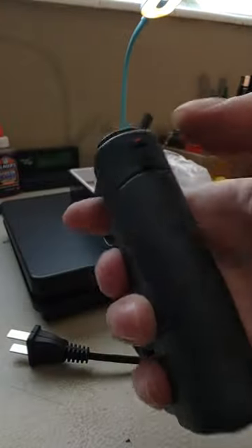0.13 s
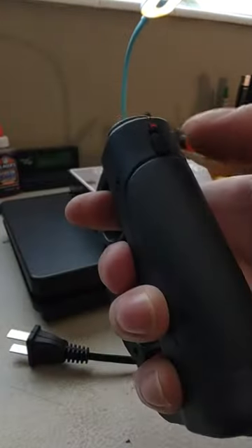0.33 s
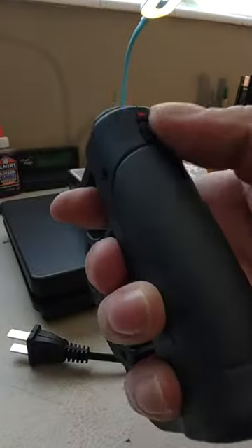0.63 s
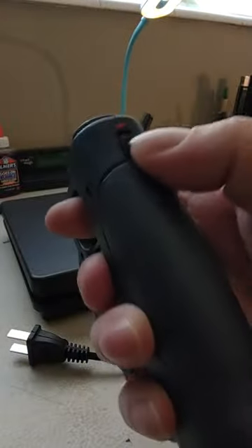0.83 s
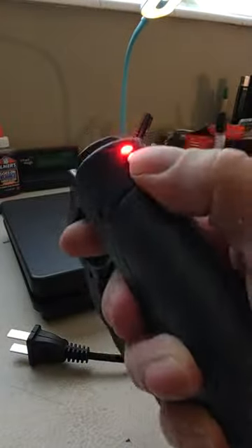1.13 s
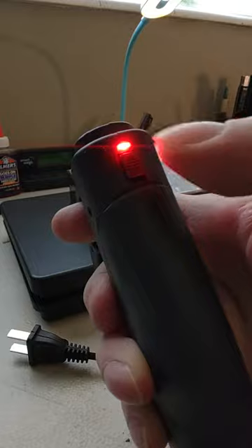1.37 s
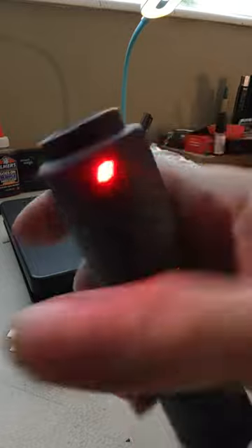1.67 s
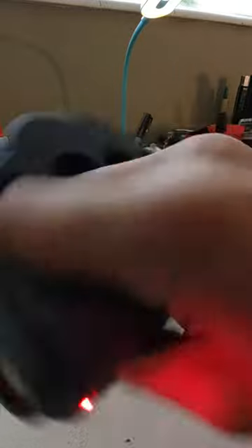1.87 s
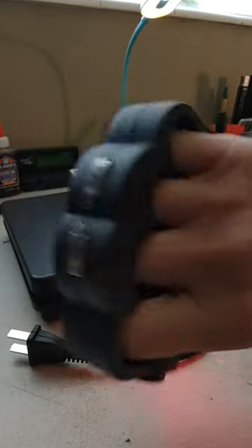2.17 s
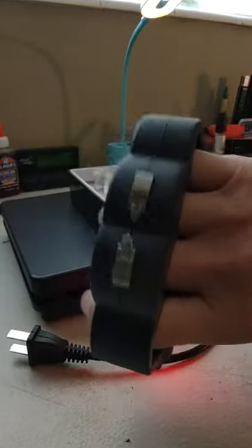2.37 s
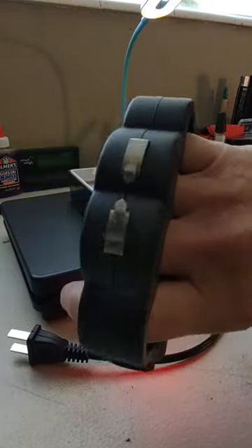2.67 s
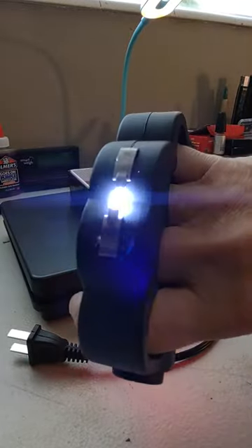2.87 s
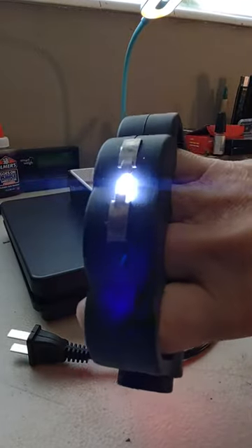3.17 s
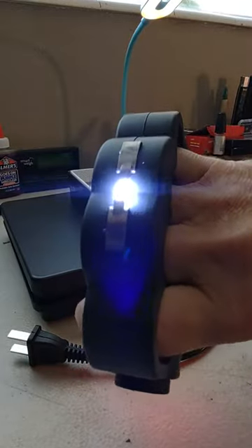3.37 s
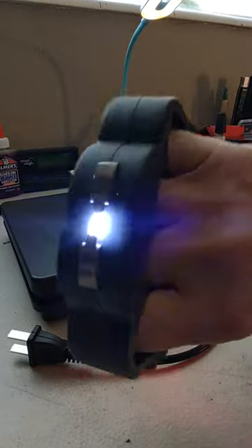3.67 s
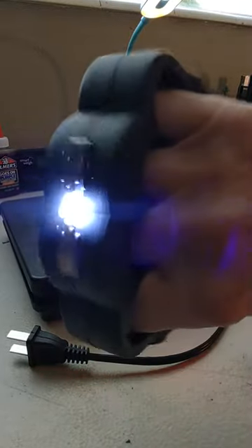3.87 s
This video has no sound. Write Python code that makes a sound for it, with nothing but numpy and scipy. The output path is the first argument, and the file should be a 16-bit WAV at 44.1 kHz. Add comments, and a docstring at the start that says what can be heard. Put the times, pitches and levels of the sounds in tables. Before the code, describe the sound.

A stun gun fires close to the microphone in a small room. First come faint finger rubs on its plastic case and a few switch clicks, then a loud, rapid crackling buzz of sparks for the last second.

```python
"""In a small room, a hand turns a plastic stun gun close to the microphone.
Fingers rub the case; the safety switch and the trigger click. Then sparks jump the electrodes
about 45 times a second, unevenly. Each is a low pressure push and a hard crack that the desk
and walls throw back; the cracks overload the recorder. Faint room noise lies underneath."""
import sys
import numpy as np
from scipy import signal
from scipy.fft import rfft, irfft, next_fast_len
from scipy.io import wavfile
from scipy.ndimage import uniform_filter1d

SR = 44100
rng = np.random.default_rng(int(sys.argv[2]) if len(sys.argv) > 2 else 0)


def store_wav(level_fs):
    """Save 16-bit WAV to argv[1]."""
    pcm = np.round(np.clip(np.atleast_2d(level_fs), -1, 1) * 32767)
    wavfile.write(sys.argv[1], SR, pcm.T.astype(np.int16))


N = 176400

# Spark train. Each row: start in seconds, relative crack level in dB.
SPARKS = [(2.9269, -16), (2.9531, -14.5), (2.9744, -16.5), (2.9986, -15.5), (3.0217, -17.5),
          (3.0398, -16.5), (3.0631, -16.7), (3.0871, -18), (3.1114, -16.5), (3.1343, -16.5), (3.1545, -18),
          (3.1752, -17), (3.1992, -16.6), (3.2249, -18.5), (3.251, -17), (3.2745, -17), (3.2978, -16.5),
          (3.3206, -16.5), (3.3417, -16.8), (3.3635, -18), (3.382, -16), (3.4046, -16), (3.4302, -15.9),
          (3.4506, -18), (3.4684, -15), (3.4914, -15.7), (3.5111, -18), (3.5366, -16), (3.5564, -18),
          (3.5747, -16.5), (3.6001, -15.5), (3.6189, -16.5), (3.6433, -16.5), (3.6633, -18),
          (3.6828, -16.5), (3.7024, -17.5), (3.7214, -16), (3.7406, -18.5), (3.7592, -17), (3.7794, -18.5),
          (3.8003, -17), (3.821, -20), (3.8445, -18), (3.8628, -20.5), (3.8852, -18), (3.9105, -16.5),
          (3.93, -16.9), (3.954, -15.5), (3.9733, -19), (3.9938, -15.7)]


def amp(db):
    """Decibels to gain."""
    return 10 ** (np.asarray(db) / 20)


def gain_at(levels, time_s):
    """Gain along (seconds, dB) points."""
    return amp(np.interp(time_s, *np.transpose(levels)))


def pan(left_minus_right_db):
    """Left and right gains."""
    return amp(left_minus_right_db * np.array([[.5], [-.5]]))


def unit(x):
    """Scale to rms 1."""
    return x / np.sqrt(np.mean(x ** 2) + 1e-20)


def along(points, hz):
    """Interpolate (Hz, value) points on a log axis."""
    points_hz, values = np.transpose(points)
    return np.interp(np.log(hz + 1), np.log(points_hz + 1), values)


def filtered(x, response):
    """Apply a frequency response."""
    size = x.shape[-1]
    padded = next_fast_len(size + 8192)
    return irfft(rfft(x, padded) * response(np.fft.rfftfreq(padded, 1 / SR)), padded)[..., :size]


def noise(spectrum, size):
    """Coloured stereo noise of rms 1, left and right alike in the bass."""
    # Stereo likeness. Each row: frequency in Hz, left-right correlation.
    likeness = [(130, 0.79), (300, 0.65), (700, 0.33), (1500, 0)]

    def mid_side(hz):
        angle = np.arccos(along(likeness, hz)) / 2
        return amp(along(spectrum, hz)) * [np.cos(angle), np.sin(angle)]

    mid, side = filtered(rng.standard_normal((2, size)), mid_side)
    return unit(np.array([mid + side, mid - side]))


def fade(t, t60_s):
    """Exponential decay, 60 dB in t60_s."""
    return np.exp(-np.log(1000) * t / t60_s)


def add(out, start_s, x):
    """Mix x into out."""
    part = out[:, round(start_s * SR):][:, :x.shape[-1]]
    part += x[..., :part.shape[1]]


def ride_band(x, levels, centre_hz, width_hz):
    """Raise or lower one band over time."""
    band = filtered(x, lambda hz: np.exp(-.5 * ((hz - centre_hz) / width_hz) ** 2))
    return x + (gain_at(levels, np.arange(N) / SR) - 1) * band


def arc():
    """Sparks: crack off hand and desk, room answer and push. The colour shifts as the hand turns."""
    # Near crack and room spectra. Each row: frequency in Hz, relative density in dB.
    near_spectrum = [(50, 3), (130, -20), (320, 14.5), (600, -1), (1000, 4), (1700, 8), (2600, -8),
                     (3300, 7), (4500, 9), (7000, -15), (10000, -23), (13000, 5), (16000, -13.5)]
    room_spectrum = [(40, -28), (80, -8), (125, -0.5), (210, -1), (270, -19), (370, -7.5), (600, -3),
                     (940, -3.5), (1030, -1), (1130, -5), (1700, -4.5), (2550, -5), (2850, -1), (3150, 0),
                     (4200, 1), (5700, 0.5), (7500, 1), (9700, -2.5), (12700, -2), (16000, -5)]
    # Bright band and low mids. Each row: time in seconds, band gain in dB.
    bite_levels = [(2.93, 3), (3.05, 3), (3.2, .5), (3.4, 2.5), (3.6, -2), (3.75, 0.5), (3.87, 0),
                   (4, -0.5)]
    body_levels = [(2.93, 7), (3.05, 1.5), (3.2, 1), (3.45, -2), (3.7, -2), (4, -1)]
    # Stereo balance. Each row: frequency in Hz, left minus right in dB.
    balance = [(100, 3.5), (300, -2.5), (2300, -1.5), (3300, -0.8), (6000, 0), (9000, 0), (11000, 2),
               (13000, 1.3), (15000, -2.5)]
    near = amp(-4) * reflections(near_spectrum, t60_s=.078, fresh_share=.1, size=3000)
    room = amp(3.5) * reflections(room_spectrum, t60_s=.34, fresh_share=.33, size=12000)
    cracks = ride_band(near + room, bite_levels, centre_hz=4160, width_hz=240)
    cracks = ride_band(cracks, body_levels, centre_hz=650, width_hz=320)
    return filtered(cracks + pushes(), lambda hz: pan(along(balance, hz)))


def reflections(spectrum, t60_s, fresh_share, size):
    """Every spark excites nearly the same dense reflections, which drift as the hand moves."""
    rise_s, drift_step_s = .00017, .1984
    out, t = np.zeros((2, N)), np.arange(size) / SR
    first_s = SPARKS[0][0]
    period_s = (SPARKS[-1][0] - first_s) / len(SPARKS)
    envelope = fade(t, t60_s) * (1 - np.exp(-t / rise_s))
    envelope *= np.sqrt(period_s * SR / np.sum(envelope ** 2))  # unit power over one period
    patterns = np.array([noise(spectrum, size) for _ in range(10)])
    for start_s, level_db in SPARKS:
        position = (start_s - first_s) / drift_step_s
        weights = np.exp(-(np.arange(len(patterns)) - position) ** 2)
        steady = np.tensordot(weights / np.linalg.norm(weights), patterns, 1)
        crack = np.sqrt(1 - fresh_share) * steady + np.sqrt(fresh_share) * noise(spectrum, size)
        add(out, start_s, amp(level_db) * envelope * crack)
    return out


def pushes():
    """Each spark gives a sharp pop and a low thump that swings back as the microphone recovers.
    Both echo once."""
    # Push strength. Each row: time in seconds, gain in dB.
    push_levels = [(2.93, -8), (3.04, -8.5), (3.11, -10.5), (3.25, -8.5), (3.4, -9), (3.77, -8.5),
                   (3.86, -11), (3.98, -8)]
    push_hz, rise_s, decay_s = 108.4, .00052, .003
    pop_db, pop_width_s = -1, .00014
    wall_delay_s, wall_push_db, wall_pop_db = .0097, -21.5, -10.5
    left_lag_s, bass_cut_hz = .00041, 37
    out, t = np.zeros((2, N)), np.arange(SR // 20) / SR
    t = np.maximum(t - np.array([[left_lag_s], [0]]), 0)
    push = (1 - np.exp(-t / rise_s)) * np.exp(-t / decay_s) * np.cos(2 * np.pi * push_hz * t)
    pop = amp(pop_db) * t / pop_width_s * np.exp(1 - t / pop_width_s)
    wall_echo = amp(wall_push_db) * push + amp(wall_pop_db) * pop
    for start_s, _ in SPARKS:
        gain = gain_at(push_levels, start_s)
        add(out, start_s, gain * (push + pop))
        add(out, start_s + wall_delay_s, gain * wall_echo)
    return filtered(out, lambda hz: (1j * hz / (1j * hz + bass_cut_hz)) ** 2)


def clicks():
    """Switch and trigger: a crack coloured by the case, the struck part's ring, a faint room tail."""
    # Each row: start in seconds, level in dB, crack cutoff in Hz, ring pitch in Hz,
    # ring over crack in dB, left minus right in dB.
    strikes = [(1.0172, -32.5, 6000, 3100, -16, -1.5), (1.0418, -49, 12000, 5900, -12, 0),
               (1.0518, -25.5, 12100, 2630, -13, 1), (1.2544, -30, 6600, 7800, -11.5, 2),
               (1.3194, -38.5, 3500, 1610, -22, -4), (1.4, -47.5, 10000, 6000, -24, -2),
               (1.703, -40, 9000, 5700, -17, 9), (1.7076, -23, 15000, 8800, -13, -2),
               (1.7102, -28, 13000, 4280, -8, 4), (1.7112, -41.5, 9000, 3720, 2.5, 8),
               (2.302, -53, 5000, 1900, -9, 0), (2.9018, -12.5, 11200, 4950, -9, -1)]
    # Plastic case spectrum. Each row: frequency in Hz, relative density in dB.
    case_spectrum = [(150, -51), (400, -16), (620, -3), (1300, -17), (2000, -13), (3000, -16.5),
                     (3600, -5.5), (4300, 0), (5200, -4.5), (6800, -2.5), (8700, -5), (10500, -7),
                     (16000, -17)]
    rise_s, tail_db = .00061, -27
    out, t = np.zeros((2, N)), np.arange(SR // 4) / SR
    attack = 1 - np.exp(-t / rise_s)
    for start_s, level_db, cutoff_hz, ring_hz, ring_db, pan_db in strikes:
        burst = filtered(noise(case_spectrum, len(t)), lambda hz: 1 / np.sqrt(1 + (hz / cutoff_hz) ** 6))
        crack = unit(burst) * fade(t, t60_s=.0072)
        phase = rng.uniform(0, 2 * np.pi, (2, 1))
        ring = 2 * amp(ring_db) * fade(t, t60_s=.013) * np.sin(2 * np.pi * ring_hz * t + phase)
        tail = amp(tail_db) * noise(case_spectrum, len(t)) * fade(t, t60_s=.18)
        add(out, start_s, amp(level_db) * pan(pan_db) * (crack + ring + tail) * attack)
    return out


def finger_rubs():
    """Skin slides over the matt case in short, grainy swells; each spot has its own resonance."""
    # Each row: middle in seconds, Gaussian width in seconds, level in dB, resonance in Hz, its lift in dB.
    strokes = [(.065, 0.012, -52, 2800, 10), (.066, 0.0065, -57, 1880, 23),
               (0.629, 0.017, -56.5, 4370, 11.5), (0.751, 0.036, -61.5, 4040, 1),
               (0.839, 0.024, -63, 6000, 4), (0.973, 0.071, -69, 4400, 4), (1.058, 0.0097, -49, 11100, 10),
               (1.287, 0.031, -65, 11500, 4), (1.361, 0.022, -58, 4200, 9), (1.735, .03, -83, 7200, 6),
               (1.792, .016, -49.5, 10200, 3), (1.895, 0.027, -54, 5640, 7), (2.017, 0.0076, -61, 6150, 10),
               (2.066, 0.016, -55, 3730, 3), (2.103, 0.036, -63, 4600, 12), (2.297, .05, -66, 3500, 4),
               (2.472, 0.024, -54.5, 1870, 15)]
    # Skin friction spectrum. Each row: frequency in Hz, relative density in dB.
    skin_spectrum = [(200, -23), (1200, -16), (2000, -5.5), (4200, 2), (7000, 0.5), (11000, -1),
                     (16000, 0.5)]
    grain_db, spot_q = 2, 12
    out, t = np.zeros((2, N)), np.arange(SR // 3) / SR
    for middle_s, width_s, level_db, spot_hz, lift_db in strokes:
        def resonance(hz):
            return 1 + (amp(lift_db) - 1) / (1 + 1j * spot_q * (hz / spot_hz - spot_hz / (hz + 1)))

        start_s = max(middle_s - t[-1] / 2, 0)
        swell = np.exp(-.5 * ((start_s + t - middle_s) / width_s) ** 2)
        grain = amp(grain_db * unit(uniform_filter1d(rng.standard_normal(len(t)), size=60)))
        friction = unit(filtered(grain * noise(skin_spectrum, len(t)), resonance))
        add(out, start_s, amp(level_db) * swell * friction)
    return out


def room_noise():
    """A distant fan under quiet rumble, mid-band air and hiss that slowly grow."""
    # Layer levels. Each row: time in seconds, level in dB.
    rumble_levels = [(0.0, -75), (0.02, -68.5), (0.55, -70.5), (0.69, -66), (2.84, -66), (2.88, -62)]
    fan_levels = [(0, -71.5), (2.88, -72.5)]
    air_levels = [(0, -79), (.8, -71), (1.3, -68), (2, -62.5), (2.88, -61)]
    hiss_levels = [(0, -72), (.9, -75.5), (1.6, -71), (2.88, -69.5)]
    # Layer spectra. Each row: frequency in Hz, relative density in dB.
    rumble_spectrum = [(20, -20), (40, -30), (60, 11), (85, -13.5), (120, 11.5), (180, -4.5), (270, -8.5),
                       (400, -43), (1000, -45)]
    fan_spectrum = [(200, -6), (400, -9.5), (580, -1), (720, 0), (900, 4), (1010, -10), (1150, -17),
                    (2000, -35)]
    air_spectrum = [(100, -20), (190, -8.5), (255, 0), (380, -7.5), (480, -3.5), (570, 0), (700, -6),
                    (860, -2), (1080, -5.5), (1600, -10.5), (2300, -25.5), (6000, -48)]
    hiss_spectrum = [(300, 4), (1300, 3), (2300, -1), (4000, 1), (8000, -5), (16000, -3.5)]
    layers = [(rumble_levels, rumble_spectrum), (fan_levels, fan_spectrum),
              (air_levels, air_spectrum), (hiss_levels, hiss_spectrum)]
    t = np.arange(N) / SR
    return sum(gain_at(levels, t) * noise(spectrum, N) for levels, spectrum in layers)


def scene():
    """Handling, then the arc, over the room's noise."""
    return arc() + clicks() + finger_rubs() + room_noise()


def record(dry):
    """The recorder rounds off the peaks and cuts the top treble."""
    ceiling, hardness, cutoff_hz = 1.02, 5, 15850
    clipped = dry / (1 + np.abs(dry / ceiling) ** hardness) ** (1 / hardness)
    lowpass = signal.firwin(401, cutoff_hz, window="blackman", fs=SR)
    return signal.fftconvolve(clipped, lowpass[None], mode="same", axes=1)


dry = scene()
out = record(dry)
store_wav(out)
```